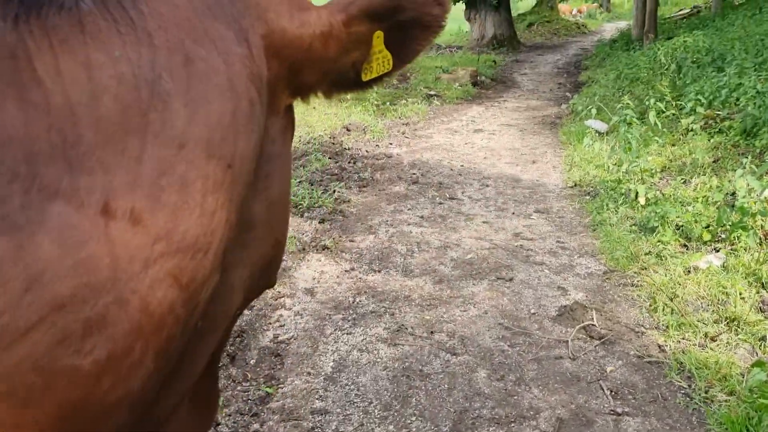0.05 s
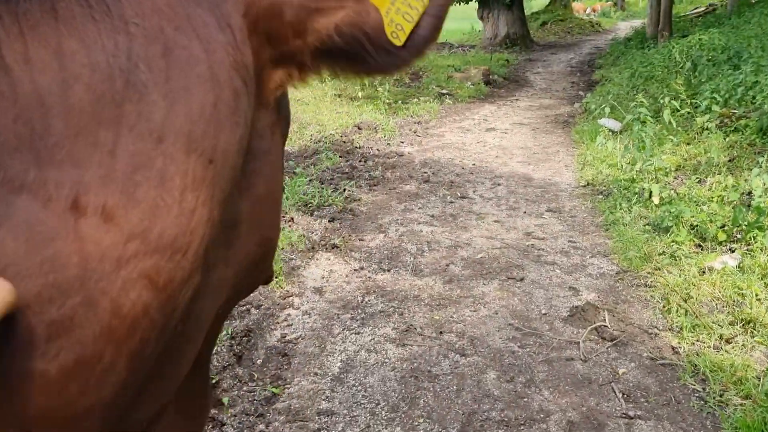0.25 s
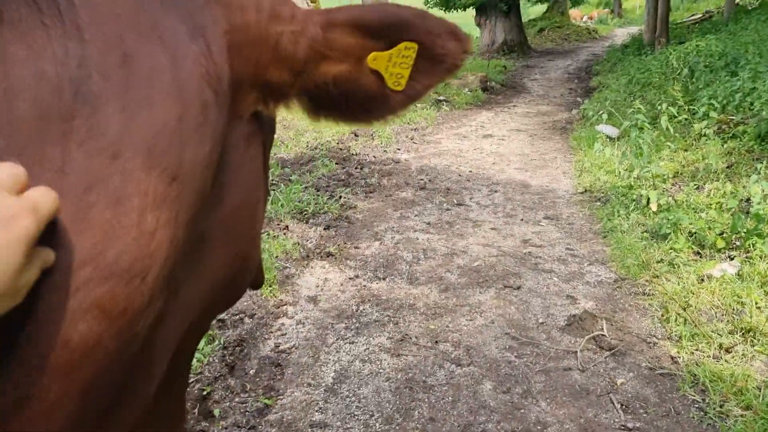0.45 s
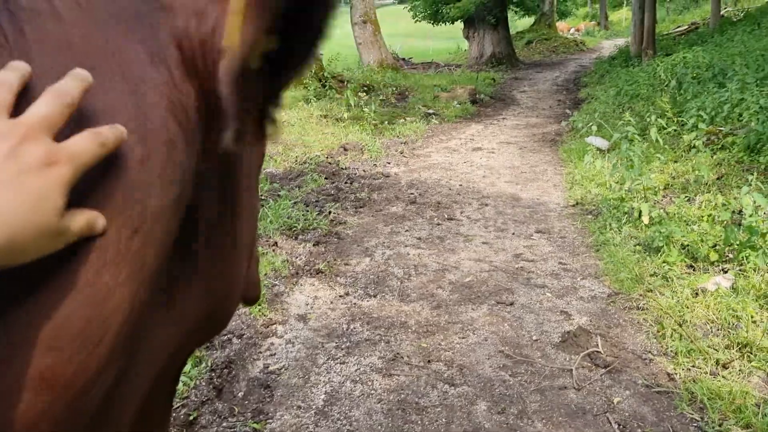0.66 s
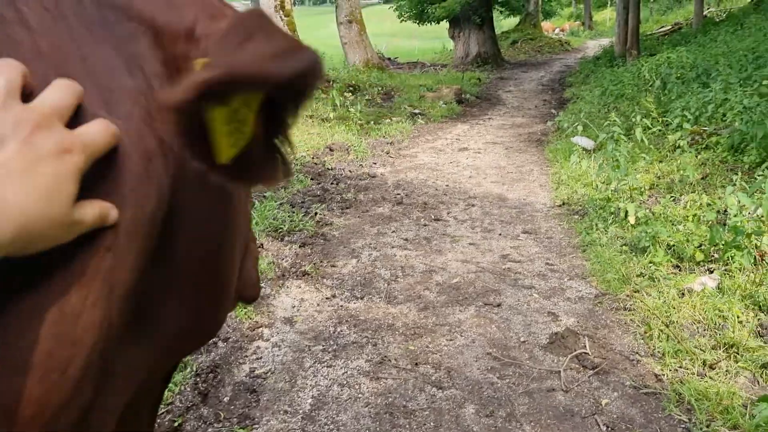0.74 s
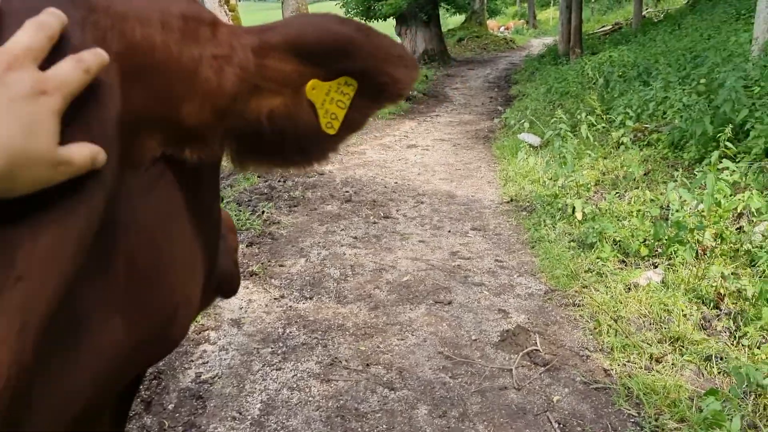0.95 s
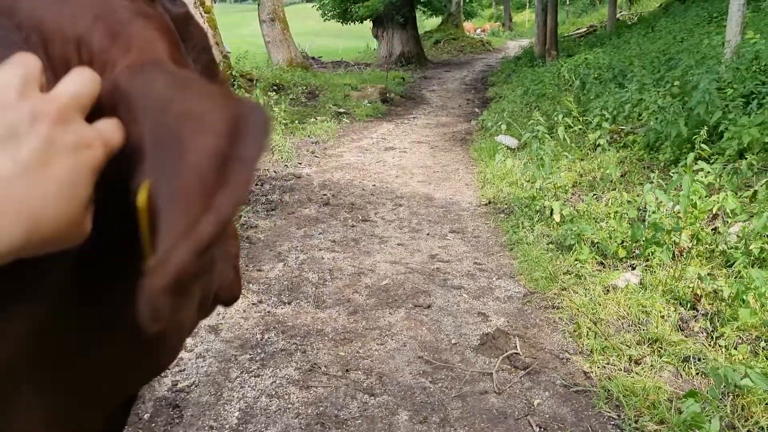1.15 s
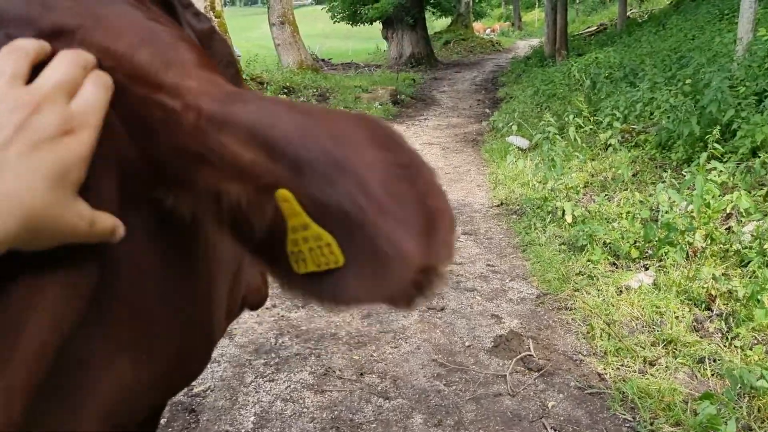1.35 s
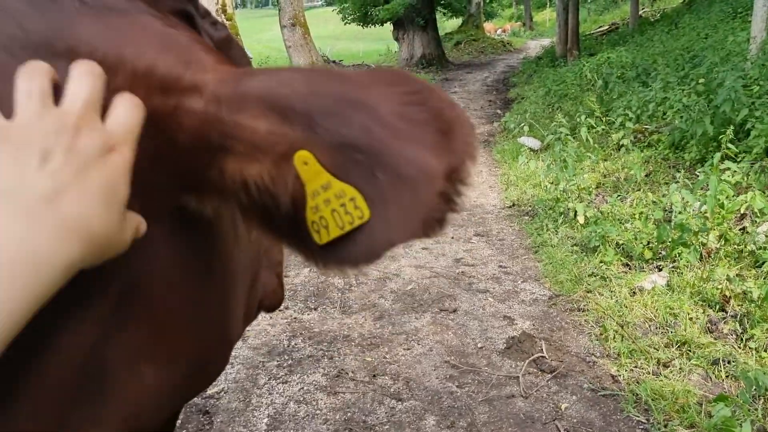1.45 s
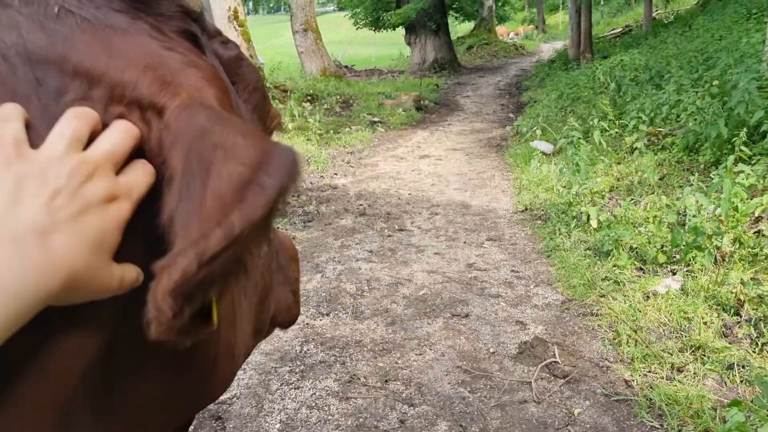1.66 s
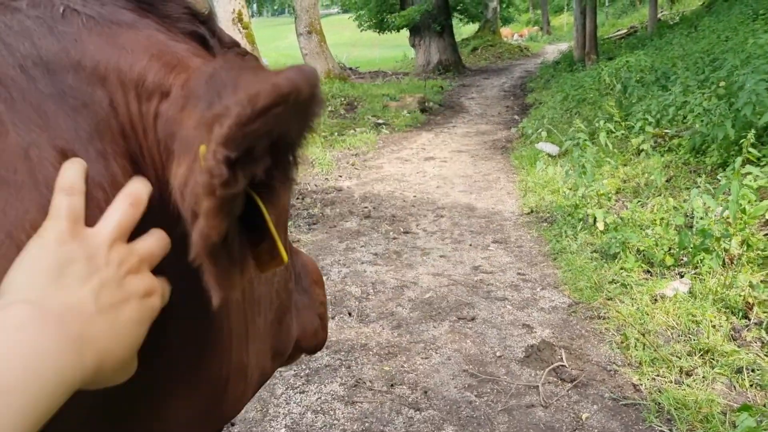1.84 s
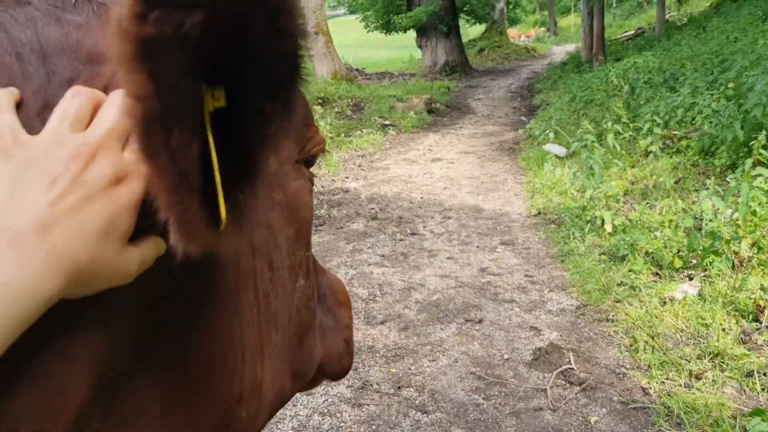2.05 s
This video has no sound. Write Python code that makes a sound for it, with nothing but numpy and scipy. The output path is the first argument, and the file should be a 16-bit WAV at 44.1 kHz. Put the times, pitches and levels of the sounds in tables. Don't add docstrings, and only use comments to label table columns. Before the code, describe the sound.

Close stereo pickup outdoors at a forest edge: one cow moo climbs, flips higher, strains and sinks abruptly, with light tag clicks, soft hand rustles, thin bird notes, low engine hum and faint leaf hiss.

```python
import sys
import numpy as np
from scipy import signal
from scipy.fft import rfft, irfft, next_fast_len
from scipy.io import wavfile
from scipy.ndimage import uniform_filter1d, map_coordinates

SR = 44100
rng = np.random.default_rng(int(sys.argv[2]) if len(sys.argv) > 2 else 0)


def generate_wav(sig):
    pcm = np.round(np.clip(np.atleast_2d(sig).T, -1, 1) * 32767).astype(np.int16)
    wavfile.write(sys.argv[1], SR, pcm)


def invert_db(level):
    return 10 ** (np.asarray(level, dtype=float) / 20)


N = 90405

# time in seconds, pitch in Hz, fundamental in dB, second partial in dB,
# throat drive in dB, nose buzz in dB.
MOO = [(0, 73.5, -54, -54.5, -8.5, -7.5), (.15, 82.02, -48, -45, 1.5, 10.5),
       (.28, 93.83, -41.5, -39.5, 4, -1), (.385, 107, -36.5, -33, 5, -6.5), (.51, 124, -33, -31.5, 5, -3.5),
       (.58, 131.1, -31, -33, 2.5, -2.5), (0.651, 133.2, -31, -36, 3.5, -5),
       (.706, 140.5, -27.5, -41.5, 3.5, -3), (.721, 167.3, -25.5, -46.5, 3.5, -7),
       (.733, 233.2, -24, -42.5, 2, -2.5), (0.744, 215.9, -25, -53, 3, -3), (.784, 225.9, -24.5, -45, 3, 6),
       (0.884, 229.6, -24, -45.5, 1, 0.5), (.91, 235.7, -25, -48, 2.5, -5),
       (1.036, 239.4, -24.5, -45.5, 5.5, -1), (1.1, 256.5, -26.5, -45.5, -1.5, 7),
       (1.17, 267.3, -27.5, -49, 0, -2.5), (1.3, 280.7, -30, -53.5, 3, 1.5),
       (1.44, 265.8, -28.5, -50, -1, -0.5), (1.56, 254.3, -26, -46.5, -1.5, 2.5),
       (1.604, 246.3, -26, -50.5, -2, 3.5), (1.645, 235.6, -24.5, -52, 5.5, 1),
       (1.692, 211.4, -24, -42, -1, 2.5), (1.734, 167.2, -26, -56, -1, 4.5),
       (1.762, 164.9, -29.5, -40, 3, -7), (1.771, 93, -43, -30.5, 3, -22),
       (1.788, 78.2, -35, -45.5, -5.5, -23.5), (1.814, 63.2, -46, -61, -23, -26)]
# centre in Hz, width in Hz, level in dB.
THROAT_GROWL = [(252.4, 94, -46.5), (521.4, 78, -47.5), (737, 27.3, -52), (1050, 66, -66),
                (1258, 41.4, -55.5)]
THROAT_BEFORE_FLIP = [(260, 70, -58.5), (533, 64, -49.5), (785, 49, -59), (1050, 73, -61.5),
                      (1320, 56, -59.5)]
THROAT_HOOT = [(438, 40, -42.5), (704, 30.4, -44), (925, 11, -55.5), (1269, 75, -52.5), (1340, 110, -60.5)]
THROAT_STRAIN = [(360, 82, -42.5), (690, 115, -50), (1091, 83, -50.5), (1450, 140, -67.5)]
THROAT_SINK = [(440, 60, -48), (706, 32, -41), (935, 50, -58), (1130, 40, -60), (1275, 45, -57),
               (1415, 45, -57)]
THROAT_LAST = [(246, 35, -41), (510, 73, -57.5)]
# centre in Hz, width in Hz, level in dB.
SINUS_DIP = [(458, 320, -2)]
# centre in Hz, width in Hz, level in dB.
NOSE_FIRST = [(1900, 70, -68), (2600, 70, -69), (3000, 55, -62), (3285, 50, -63), (3775, 50, -66)]
NOSE_SHUT = [(1790, 36, -69), (2513, 46, -59.5), (2880, 93, -66), (3280, 36, -61), (3750, 51, -68)]
NOSE_OPEN = [(1908, 47, -58.5), (2330, 110, -66), (2596, 43.6, -53.5), (3062, 54, -58), (3330, 52, -64.5)]
NOSE_STRAIN = [(1710, 58, -67), (1920, 77, -61), (2134, 50, -66), (2557, 37, -55), (3000, 79, -60),
               (3410, 37, -62.5)]
# start in seconds, length in seconds, depth from 0 to 1.
CREAKS = [(1.144, 0.066, 0.57), (1.236, 0.034, 0.5), (1.323, 0.028, 0.6), (1.43, 0.027, 0.5)]
# start in seconds, length in seconds, change in dB.
NOSE_SWELLS = [(0.213, .053, 4), (0.905, .145, 4), (1.059, .025, -7), (1.225, .025, 4.5), (1.63, 0.042, 6),
               (1.693, .07, -0.5)]
# frequency in Hz, level in dB per Hz.
BREATH_COLOUR = [(3000, -4), (5500, -10), (7300, -1), (7900, -8), (8900, -8), (9700, 0), (10200, -20),
                 (15800, -26)]
# frequency in Hz, phase in radians by which left leads.
LEFT_LEADS = [(60, .1), (250, 0.47), (500, 0.75), (700, 2.28), (1000, 0.11), (1400, 1.92), (2550, 0.98),
              (3100, 1.68)]
# frequency in Hz, left over right in dB.
LEFT_LOUDER = [(200, 1.5), (520, -2.5), (700, 1), (950, 10.5), (1300, 2), (2550, -5), (3050, 4.5),
               (3800, -11.5)]
# start in seconds, peak in dB, ring pitch in Hz, crack over ring in dB.
TICKS = [(.337, -42.5, 1050, -22), (.344, -41, 1230, -8.5), (.3482, -40, 1930, -17.5),
         (.349, -36.5, 3030, -12), (.352, -43.5, 1900, -10.5), (.414, -49.5, 1760, -18),
         (0.645, -49.5, 3570, 4), (0.652, -48, 3880, -9.5), (.771, -64, 3000, 4), (1.229, -55.5, 3440, 5),
         (1.833, -56, 2770, -10), (1.9327, -45.5, 3040, -6), (1.9354, -56, 1900, -5)]
# start in seconds, length in seconds, level in dB, centre in Hz.
RUBS = [(0.283, 0.018, -72.5, 12430), (0.335, 0.025, -68.5, 5930), (0.763, 0.048, -76, 8940),
        (1.123, 0.09, -85, 11300), (1.23, 0.048, -61.5, 5060), (1.288, 0.073, -66.5, 11900),
        (1.624, 0.095, -67, 8320), (1.802, 0.018, -66.5, 10760), (2.011, 0.033, -66, 6570)]
# start in seconds, length in seconds, pitch in Hz, level in dB, warble in radians.
BIRD_NOTES = [(1.022, .065, 4057, -61, .5), (1.28, .075, 3950, -58, .5), (1.538, .075, 3915, -57, .5),
              (1.802, .045, 3905, -60, .5), (1.872, .03, 3908, -60, .5), (1.922, .03, 3902, -61, .5),
              (.365, .03, 7700, -72, 1), (.41, .085, 7620, -76, 4), (1.11, .11, 4057, -67, .7),
              (1.365, .14, 3955, -63, .5), (1.4, .06, 5760, -77, 2), (1.62, .04, 7750, -74, 3),
              (1.93, .12, 5720, -75, 2), (1.68, .045, 3935, -64, 1), (.07, .1, 5780, -78, 3),
              (1.96, .1, 3900, -66, .7)]
# time in seconds, firing rate in Hz, level in dB.
ENGINE = [(0, 67.7, -58.5), (.8, 62.94, -52.5), (1.4, 61.4, -52), (1.752, 59.1, -50.5), (2.05, 55.8, -57)]
# multiple of the firing rate, level in dB.
ENGINE_ORDERS = [(2, -12), (1.4, -16.5)]
# centre in Hz, width in Hz, level in dB.
RUMBLE = [(63.4, 63, -61.5), (130, 83, -73.5)]
# frequency in Hz, level in dB per Hz.
LEAF_COLOUR = [(30, -30), (90, -2), (300, -7), (800, -14.5), (2100, -20.5), (3400, -20.5), (5000, -27.5),
               (15700, -46)]
# frequency in Hz, likeness of left and right from 0 to 1.
LEAF_LIKENESS = [(60, 0.97), (130, 0.64), (290, 1), (640, 0.073), (15000, 0.015)]

STRAIN_S, STRAIN_LASTS_S = 1.1, .45
CLOSURE = -.2
T = np.arange(N) / SR


def unit(x):
    return x / np.sqrt(np.mean(x ** 2) + 1e-20)


def along(points, hz):
    f, v = np.transpose(points)
    return np.interp(np.log(hz + 1), np.log(f + 1), v)


def wobble(rate):
    knots = rng.standard_normal(int(N * rate / SR) + 4)
    return map_coordinates(knots, [np.arange(N) * rate / SR])


def filtered(x, response):
    m = next_fast_len(N + SR // 2)
    return irfft(rfft(x, m) * response(np.fft.rfftfreq(m, 1 / SR)), m)[..., :N]


def tube(peaks):
    def response(f):
        total = 0
        for k, (centre, width, db) in enumerate(peaks):
            damping = 1j * f * width
            total = total + (-1) ** k * invert_db(db) * damping / (centre ** 2 - f ** 2 + damping)
        return total
    return response


def window(s, length, edge):
    inside = np.minimum(T - s, s + length - T)
    return np.sin(np.pi / 2 * np.clip(inside / edge + .5, 0, 1)) ** 2


def until(s, edge):
    return window(-1, 1 + s, edge)


def echoes(x, t60, seconds):
    t = np.arange(int(SR * seconds)) / SR
    tail = rng.standard_normal((2, len(t))) * invert_db(-60 * t / t60)
    return signal.fftconvolve(x[None], tail / np.linalg.norm(tail[0]), axes=1)[:, :N]


def fold_pulses(phase, hz):
    creak = sum(depth * window(s, length, 0.004) for s, length, depth in CREAKS)
    k = np.arange(3, 60)[:, None]
    harmonics = np.cos(k * (phase - CLOSURE)) * np.clip(9 - k * hz / 500, 0, 1)
    uneven = 1 + creak * np.cos((phase - CLOSURE) / 2)
    half_pitch = .77 * creak * (np.cos(1.5 * phase) + np.cos(2.5 * phase))
    return np.sqrt(2) * (harmonics.sum(0) * uneven + half_pitch)


def breath_puffs(phase):
    return unit((1 + np.cos(phase - CLOSURE)) ** 2 * rng.standard_normal(N))


def throat_voice(drive, strain, late):
    early, low = until(.44, .15), until(.725, .02)
    last = window(1.764, 2, .01)
    shapes = [
        (early, lambda f: tube(THROAT_GROWL)(f) * (1 - tube(SINUS_DIP)(f))),
        (low - early, tube(THROAT_BEFORE_FLIP)),
        (1 - low - late, tube(THROAT_HOOT)),
        (strain, tube(THROAT_STRAIN)),
        (late - strain - last, tube(THROAT_SINK)),
        (last, tube(THROAT_LAST))]
    voice = sum(filtered(drive * share, shape) for share, shape in shapes)
    return filtered(voice, lambda f: 1 / np.sqrt(1 + (f / 1480) ** 16))


def nose_voice(buzz, late):
    first, shut = until(.15, .12), until(.28, .12)
    shapes = [(first, NOSE_FIRST), (shut - first, NOSE_SHUT), (1 - shut - late, NOSE_OPEN),
              (late, NOSE_STRAIN)]
    voice = 0
    for share, peaks in shapes:
        voice = voice + filtered(buzz * share, lambda f: tube(peaks)(f) / (1 + (1650 / (f + 1)) ** 12))
    return voice


def cow():
    s, *columns = np.transpose(MOO)
    hz, tone_db, second_db, throat_db, nose_db = [np.interp(T, s, c) for c in columns]
    alive = until(1.82, .03) * invert_db(.35 * wobble(50))
    strain, late = window(STRAIN_S, STRAIN_LASTS_S, .08), window(STRAIN_S, 2, .08)
    jitter = .0025 * (1 + 1.5 * strain) * wobble(70)
    phase = 2 * np.pi * np.cumsum(hz * (1 + jitter)) / SR

    flicker_db = 1.2
    swells = sum(db * window(s, length, 0.0073) for s, length, db in NOSE_SWELLS)
    nose_db = nose_db + swells + flicker_db * wobble(29.75)
    throat_db = throat_db + flicker_db * strain * wobble(40.2)

    pulses = fold_pulses(phase, hz)
    gust = np.sqrt(SR / 2 / hz)
    drive = alive * invert_db(throat_db) * (pulses + .13 * gust * breath_puffs(phase))
    buzz = alive * invert_db(nose_db) * (pulses + .26 * (1 + 1.5 * strain) * gust * breath_puffs(phase))
    throat, nose = throat_voice(drive, strain, late), nose_voice(buzz, late)

    twist = np.clip(.022 * (hz - 62), 0, 1.1)
    partials = invert_db(tone_db) * np.sin(phase) + invert_db(second_db) * np.sin(2 * phase + twist)
    tone = np.sqrt(2) * alive * partials

    puffs = np.array([breath_puffs(phase), breath_puffs(phase)])
    hiss = unit(filtered(puffs, lambda f: invert_db(along(BREATH_COLOUR, f)) * (f > 1000)))
    air = alive * invert_db(-58.5 + tone_db / 2) * hiss

    side = np.array([[.5], [-.5]])
    placed = filtered(tone + throat + nose, lambda f: invert_db(side * along(LEFT_LOUDER, f))
                      * np.exp(1j * side * along(LEFT_LEADS, f)))
    scatter = echoes(throat + nose, .09, .25)
    return air + invert_db(-15) * scatter + placed


def ear_tag():
    out, t = np.zeros((2, N + SR)), np.arange(SR // 20) / SR
    ring_t60, crack_t60, crack_level_db = 0.014, 0.027, -2.5
    offset = np.array([[.8], [-.8]])
    for s, db, hz, crack_db in TICKS:
        onset = 1 - np.exp(-t / 0.00014)
        ring = invert_db(-60 * t / ring_t60) * np.sin(2 * np.pi * hz * t + offset) * onset
        fade = invert_db(crack_level_db + crack_db - 60 * t / crack_t60)
        crack = fade * rng.standard_normal((2, len(t)))
        out[:, round(s * SR):][:, :len(t)] += invert_db(db + 9) * (ring + crack)
    return filtered(out[:, :N], lambda f: 1 / (1 + 1j * f / 5000) ** 2)


def hide():
    out = 0
    for s, length, db, hz in RUBS:
        noise = rng.standard_normal((2, N))
        octaves = .5
        brush = unit(filtered(noise, lambda f: np.exp(-(np.log2((f + 1) / hz) / octaves) ** 2 / 2)))
        grain_db = 2 * wobble(190)
        out = out + invert_db(db + grain_db) * window(s, length, 0.013) * brush
    return out


def birds():
    song = 0
    for s, length, hz, db, warble in BIRD_NOTES:
        whistle = np.sin(2 * np.pi * hz * T + warble * wobble(74))
        song = song + np.sqrt(2) * invert_db(db) * window(s, length, 0.0053) * whistle
    return (song + invert_db(-8) * echoes(song, 1.4, 1)) * invert_db([[-5], [5]])


def engine():
    s, hz, db = np.transpose(ENGINE)
    phase = 2 * np.pi * np.cumsum(np.interp(T, s, hz) * (1 + 0.0072 * wobble(11))) / SR
    tones = 0
    for multiple, order_db in [(1, 0.0015)] + list(ENGINE_ORDERS):
        flutter_db = 2.5 * wobble(14)
        tones = tones + invert_db(order_db + flutter_db) * np.sin(multiple * phase)
    rumble = 0
    for centre, width, band_db in RUMBLE:
        noise = rng.standard_normal((2, N))
        band = filtered(noise, lambda f: 1 / (1 + ((f - centre) / (width / 2)) ** 6))
        rumble = rumble + invert_db(band_db) * unit(band)
    return np.sqrt(2) * invert_db(np.interp(T, s, db)) * tones + rumble


def leaves():
    z = signal.stft(rng.standard_normal((2, N)), nperseg=512)[2]
    patches = uniform_filter1d(rng.standard_normal(z.shape[1:]), 6, 0)
    patches = uniform_filter1d(patches, 10, 1)
    pair = signal.istft(z * invert_db(1.5 * unit(patches)), nperseg=512)[1][:, :N]

    def spread(f):
        turn = np.arccos(np.clip(along(LEAF_LIKENESS, f), -1, 1)) / 2
        return invert_db(along(LEAF_COLOUR, f)) * np.array([np.cos(turn), np.sin(turn)]) * (f > 25)

    mid, side = filtered(pair, spread)
    return invert_db(-54) * unit(np.array([mid + side, mid - side]))


def scene():
    return cow() + ear_tag() + hide() + birds() + engine() + leaves()


def roll_off(x):
    return signal.sosfilt(signal.butter(12, 16030, fs=SR, output="sos"), x)


def record(dry):
    return roll_off(dry)


dry = scene()
out = record(dry)
generate_wav(out)
```